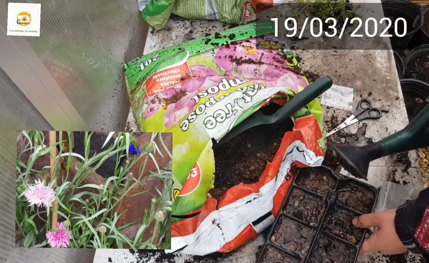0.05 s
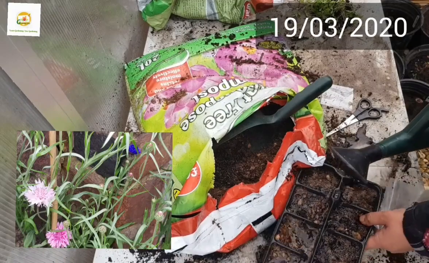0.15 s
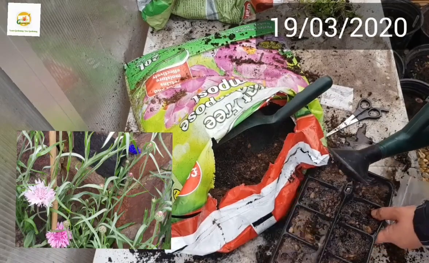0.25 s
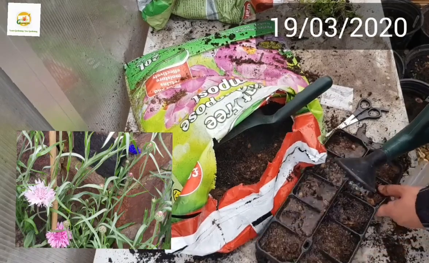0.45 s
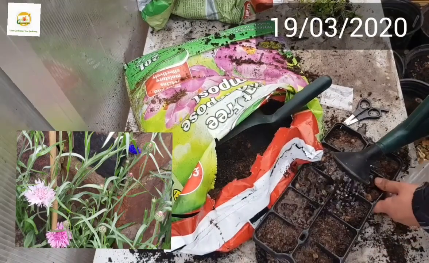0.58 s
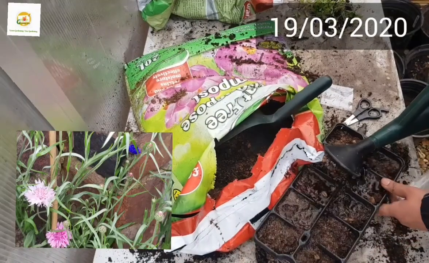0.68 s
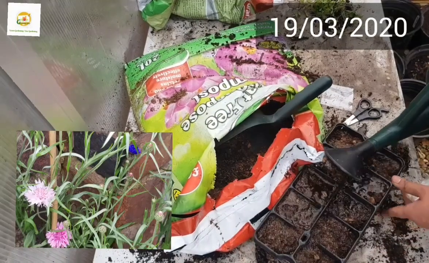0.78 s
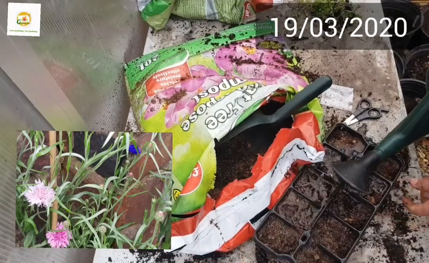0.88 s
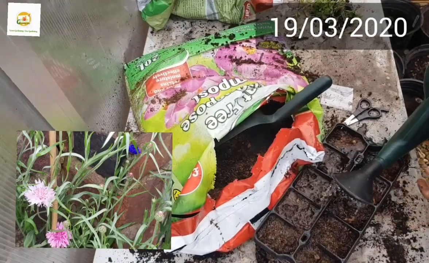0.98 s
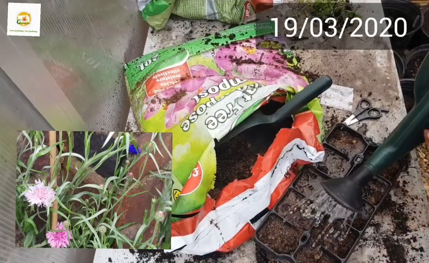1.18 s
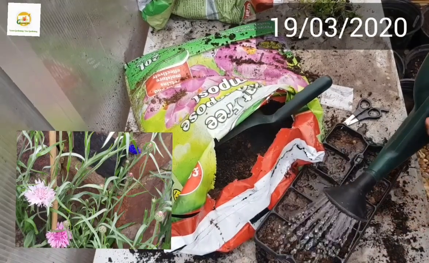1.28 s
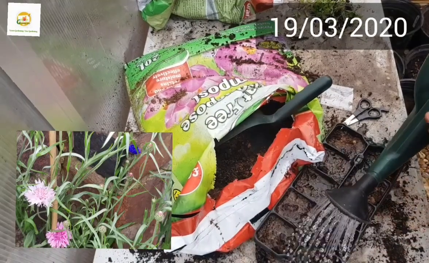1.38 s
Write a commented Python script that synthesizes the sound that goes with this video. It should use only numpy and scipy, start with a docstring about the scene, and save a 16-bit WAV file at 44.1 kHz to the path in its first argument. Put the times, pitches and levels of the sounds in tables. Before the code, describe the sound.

A plastic seed tray scrapes over a gritty bench, then water starts sprinkling softly.

```python
"""Seed tray and watering can

A plastic seed tray full of compost is dragged over a gritty bench. It sticks and slips, so it
judders and booms over the crunch of the grit, then knocks as it is let go. The first drops spit
from the rose of a watering can and thicken into a fine spray that fizzes on the plastic and patters
on the compost. Around it all is a small hard-walled room with a low background rumble."""
import sys
import numpy as np
from scipy import signal
from scipy.fft import rfft, irfft
from scipy.io import wavfile
from scipy.ndimage import uniform_filter1d

SR = 44100
rng = np.random.default_rng(int(sys.argv[2]) if len(sys.argv) > 2 else 0)


def store_pcm(level_fs):
    """Save levels as 16-bit WAV."""
    pcm = np.round(np.clip(level_fs, -1, 1) * 32767).astype(np.int16)
    wavfile.write(sys.argv[1], SR, np.atleast_2d(pcm).T)


N = 63945
T = np.arange(N) / SR

# Tone of the background rumble and hiss. Each row: frequency in Hz, relative level in dB.
RUMBLE_EQ = [(20, -26), (33, -17), (48, 1.5), (65, 2), (90, -6.5), (130, -2.5), (175, -13.5), (230, -12.5),
             (330, -24.5), (600, -20), (1200, -25.5), (2500, -35), (6000, -30), (16000, -28.5)]
# How centred the background sits. Each row: frequency in Hz, left-right likeness from 0 to 1.
RUMBLE_LIKENESS = [(30, 0.79), (120, 1), (300, 0.58), (600, 0.37), (1200, 0), (3000, .05), (16000, 0)]
# Tone of the reverb. Each row: frequency in Hz, gain on the reverb return in dB.
REVERB_EQ = [(60, -18), (200, -24.5), (500, -4), (1200, -5), (4000, 0), (16000, 4)]

# Swell of the spray on plastic, then on compost. Each row: time in seconds, level in dB.
FIZZ_FADER = [(.8, -84), (.87, -62.5), (.95, -69), (1.03, -53), (1.07, -64), (1.11, -58.5), (1.15, -67),
              (1.228, -56), (1.245, -50.5), (1.29, -52.5), (1.34, -54.5), (1.38, -50), (1.45, -46)]
PATTER_FADER = [(.8, -71.5), (1.0, -67), (1.1, -64.5), (1.22, -94), (1.29, -55), (1.35, -60.5),
                (1.41, -51.5), (1.45, -51)]
# Tone of the bright fizz and the dull patter. Each row: frequency in Hz, relative level in dB.
FIZZ_EQ = [(400, -18), (1500, -14), (2300, -5), (3600, 1), (5500, -1.5), (8500, 0.5), (12000, -1),
           (16000, -2)]
PATTER_EQ = [(100, -20), (300, -2), (600, -2), (1000, 1.5), (1500, -4.5), (2200, -11.5), (5000, -29),
             (16000, -52)]
# Single drops that stand out of the spray. Each row: start in seconds, relative level in dB,
# centre in Hz, width in octaves, decay in seconds.
SPITS = [(.904, -43.5, 7300, 0.43, 0.0066), (0.955, -44, 12400, 0.16, .002),
         (0.971, -43.5, 4560, 0.11, 0.0076), (1.028, -38, 11200, 0.31, 0.0024),
         (1.073, -42, 12300, .3, .002), (1.0915, -37, 9100, 0.55, 0.0079),
         (1.205, -29.5, 11200, .25, 0.0033), (1.234, -29.5, 11000, 0.96, 0.0033),
         (1.248, -31.5, 3070, 0.98, 0.0048), (1.3153, -36, 5000, 0.67, 0.0048),
         (1.349, -31, 10900, 1, 0.0035), (1.398, -33, 8900, .6, .002)]

# Bench thumps. Each row: start in seconds, level in dB, pitch in Hz, decay in seconds.
BENCH_THUMPS = [(.145, -40.5, 62, 0.028), (0.224, -42, 70, .04), (0.359, -29, 87, 0.028),
                (.6, -34, 57.6, 0.027), (0.616, -41, 126.8, 0.054), (0.688, -43, 46.6, 0.13),
                (.778, -35.5, 105, 0.016)]
# Knocks of the tray. Each row: start in seconds, relative level in dB, centre in Hz,
# width in octaves, decay of the crack in seconds.
TRAY_KNOCKS = [(0.064, -41, 1325, 0.27, 0.0064), (.148, -31.5, 1020, 0.23, 0.0036),
               (0.2576, -24.5, 950, 0.32, 0.0022), (0.285, -24.5, 3300, 0.31, 0.0076),
               (.453, -21.5, 1320, 0.32, 0.0081), (.5065, -25.5, 780, 0.41, 0.0082),
               (.527, -22, 4000, 0.31, 0.0027), (.607, -25.5, 1200, 1.45, 0.0022),
               (0.6881, -24, 900, 0.72, 0.0049), (.689, -18.5, 2276, 0.1, 0.0014),
               (.696, -31, 1040, 0.33, 0.0033), (.744, -41, 814, .6, 0.0025),
               (.778, -28, 1235, 0.47, 0.0022)]
# Ring of knocked plastic. Each row: pitch in Hz, relative level in dB, seconds to fall 60 dB.
KNOCK_RING = [(798, 0.5, 0.05), (896, 2.5, 0.031), (1017, -2.5, 0.049), (1356, -3.5, 0.073),
              (1673, 4, 0.028), (2160, 1.5, 0.021), (2930, -17, 0.026)]
# Shape of the drag's grit, rattle and boom. Each row: time in seconds, level in dB.
GRIT_FADER = [(0, -69), (.04, -64.5), (.072, -49.5), (.13, -62), (.16, -53), (.22, -50), (.29, -39),
              (.39, -41.5), (.47, -39.5), (.53, -37), (.576, -40), (.63, -56), (.665, -49), (.692, -40.5),
              (.73, -60.5), (.77, -50), (.8, -50), (.85, -67.5)]
RATTLE_FADER = [(0, -71), (.07, -61), (.13, -61), (.22, -54), (.26, -42.5), (.31, -39.5), (.37, -43),
                (.42, -35.5), (.48, -42), (.53, -31), (.6, -51), (.635, -54.5), (.66, -53), (.695, -42),
                (.725, -59.5), (.77, -57), (.795, -61), (.84, -78)]
BOOM_FADER = [(0, -70), (.13, -72), (.2, -50), (.24, -39), (.32, -34.5), (.36, -32.5), (.385, -27.5),
              (.42, -34), (.48, -31.5), (.51, -32), (.595, -30), (.635, -47.5), (.7, -50), (.85, -67)]
# Tone of the same three layers. Each row: frequency in Hz, relative level in dB.
GRIT_EQ = [(300, -46), (1200, -3.5), (2500, -1.5), (4200, -1), (5500, -2.5), (8000, -4), (12000, -6),
           (16000, -10)]
RATTLE_EQ = [(100, -23.5), (300, 2), (500, 0), (900, 4), (1300, -5.5), (1900, -6.5), (2800, -7.5),
             (5000, -22.5), (16000, -34)]
BOOM_EQ = [(30, -15), (80, -1), (225, -3.5), (270, -5.5), (330, -13), (600, -34), (3000, -53)]
# Resonances of the tray's cells (low) and walls (high).
# Each row: pitch in Hz, bandwidth in Hz, relative level in dB.
CELL_MODES = [(77, 25, -13), (121, 26, 0.5), (161.5, 27, 3.5), (193.8, 26.3, 2.5), (236.4, 16, -2)]
WALL_MODES = [(367, 29, -7.5), (513.7, 44, 2.5), (640, 41, -1.5), (702, 8.8, -3), (833, 41, -2),
              (940, 48, -3), (1070, 116, 2.5), (1350, 120, -12), (1744, 41, -6.5), (2790, 85, -8.5)]

RUMBLE_DB, WATER_SEND_DB, LEFT_OVER_RIGHT_DB = -50.5, -2.5, 0.45
BASS_T60_S, TREBLE_T60_S, TAIL_SHIFTS_PER_S = 0.25, 0.067, 9.01
FIZZ_PER_S, PATTER_PER_S, GRIT_PER_S, RATTLE_PER_S = 1500, 1000, 3000, 1600
JUDDER_HZ, JUDDER_WANDER = 122, 0.07  # stick-slip rate, and its drift as a share of that rate
TREBLE_SPREAD = 0.85  # share of the bright layers' power that differs between the ears
LEFT_LAG_SAMPLES, HIGH_CUT_HZ = 4, 15900


def amp(db):
    """Decibels to gain."""
    return 10 ** (np.asarray(db) / 20)


def unit(x):
    """Scales to rms 1."""
    return x / np.sqrt(np.mean(x ** 2) + 1e-20)


def curve_at(points, hz):
    """Reads a curve on a log-frequency axis."""
    f, value = np.transpose(points)
    return np.interp(np.log(hz + 1), np.log(f + 1), value)


def fader(points):
    """Rides the gain along a dB curve, then fades at 77 dB a second after its last point."""
    times, db = np.transpose(points)
    return amp(np.interp(T, times, db) - 77 * np.maximum(T - times[-1], 0))


def place(mix, start_s, sound):
    """Lays a sound into the mix at its cue."""
    part = mix[:, max(round(start_s * SR), 0):]
    part[:, :sound.shape[-1]] += sound[..., :part.shape[1]]


def eq(x, points, size=2048):
    """Minimum-phase EQ: shapes the tone with no ringing ahead of an attack."""
    log_gain = np.log(amp(curve_at(points, abs(np.fft.fftfreq(size, 1 / SR)))))
    taps = np.fft.ifft(np.exp(np.conj(signal.hilbert(log_gain)))).real
    return signal.oaconvolve(x, taps[None], axes=1)[:, :N]


def resonate(x, modes):
    """Plays a signal through damped resonances; the narrow ones ring longest."""
    t = T[:SR // 4]
    body = np.zeros(len(t))
    for hz, width_hz, db in modes:
        envelope = amp(db) * np.sqrt(width_hz) * np.exp(-np.pi * width_hz * t)
        body += envelope * np.sin(2 * np.pi * hz * t + rng.uniform(0, 2 * np.pi))
    return signal.oaconvolve(x, body[None], axes=1)[:, :N]


def stereo_noise(length, spread):
    """White noise, from mono at spread 0 to fully wide at 1."""
    noise = rng.standard_normal((3, length))
    return np.sqrt(1 - spread) * noise[0] + np.sqrt(spread) * noise[1:]


def grains(per_s, size_db, decay_s, spread):
    """A scatter of tiny noise bursts of uneven size, each with an instant attack."""
    sizes = amp(size_db * np.minimum(rng.exponential(1, N), 4))
    hits = sizes * (rng.random(N) < per_s / SR)
    power = signal.lfilter([1], [1, -np.exp(-2 / (decay_s * SR))], hits ** 2 + 1e-12)
    return unit(np.sqrt(power) * stereo_noise(N, spread))


def burst(hz, octaves, decay_s, spread):
    """A dying puff of noise around one frequency."""
    t = T[:SR // 5]
    f = np.fft.rfftfreq(len(t), 1 / SR) + 1
    rolloff = np.sqrt(1 + (np.log2(f / hz) / octaves) ** 6)
    noise = irfft(rfft(stereo_noise(len(t), spread)) / rolloff, len(t))
    return unit(noise) * np.exp(-t / decay_s)


def room_rumble():
    """The bed: a steady low rumble near the centre, with a faint wide hiss."""
    hz = np.fft.rfftfreq(N, 1 / SR)
    left, separate = rfft(rng.standard_normal((2, N))) * amp(curve_at(RUMBLE_EQ, hz))
    likeness = curve_at(RUMBLE_LIKENESS, hz)
    right = likeness * left + np.sqrt(1 - likeness ** 2) * separate
    return amp(RUMBLE_DB) * unit(irfft(np.array([left, right]), N))


def wall_tail():
    """A short dense tail from close walls, different in each ear; the treble dies first."""
    hz, t, noise = signal.stft(rng.standard_normal((2, SR // 3)), SR, nperseg=256)
    t60_s = curve_at([(200, BASS_T60_S), (12000, TREBLE_T60_S)], hz)
    fade = amp(-60 * t / t60_s[:, None])
    tail = signal.istft(noise * fade / np.linalg.norm(fade, axis=1, keepdims=True), SR)[1]
    tail *= np.minimum(T[:tail.shape[1]] / 0.0029, 1)  # soften the onset
    return tail / np.linalg.norm(tail[0])


def room_reverb(send, tails=5):
    """The reflections change as tray and can move: the send crossfades from one tail to the next."""
    wet = np.zeros((2, N))
    for k in range(tails):
        share = np.maximum(1 - abs((T * TAIL_SHIFTS_PER_S + k) % tails - 1), 0)
        wet += signal.fftconvolve(send * np.sqrt(share), wall_tail(), axes=1)[:, :N]
    return eq(wet, REVERB_EQ)


def water_spray():
    """Fine drops fizz on the plastic and patter on the compost; a few spit louder."""
    fizz = grains(FIZZ_PER_S, size_db=3, decay_s=0.0012, spread=TREBLE_SPREAD)
    patter = grains(PATTER_PER_S, size_db=1.5, decay_s=0.0017, spread=0.62)
    out = unit(eq(fizz, FIZZ_EQ)) * fader(FIZZ_FADER)
    out += unit(eq(patter, PATTER_EQ)) * fader(PATTER_FADER)
    for start_s, db, hz, octaves, decay_s in SPITS:
        place(out, start_s, amp(db - 8) * burst(hz, octaves, decay_s, TREBLE_SPREAD))
    return out


def bench_thumps():
    """The bench gives a short low swing when the tray's weight shifts."""
    out, t = np.zeros((2, N)), T[:SR // 2]
    attack = 1 - np.exp(-t / 0.0048)
    for start_s, db, hz, decay_s in BENCH_THUMPS:
        place(out, start_s, amp(db) * attack * np.exp(-t / decay_s) * np.sin(2 * np.pi * hz * t))
    return out


def tray_knocks():
    """Dry cracks of the plastic, each ringing the modes near its own centre most."""
    out, t = np.zeros((2, N)), T[:SR // 5]
    for start_s, db, centre_hz, octaves, crack_s in TRAY_KNOCKS:
        ring = np.zeros(len(t))
        for hz, mode_db, t60_s in KNOCK_RING:
            rolloff = 1 + (np.log2(hz / centre_hz) / octaves) ** 4
            ring += amp(mode_db - 60 * t / t60_s) * np.sin(2 * np.pi * hz * t) / rolloff
        crack = burst(centre_hz, octaves, crack_s, spread=0.4)
        place(out, start_s, amp(db) * (amp(-9) * crack + amp(-12) * ring))
    return out


def stick_slip():
    """The tray catches and lets go: one click per slip, uneven in pace and strength."""
    drift = unit(uniform_filter1d(rng.standard_normal(N), 200))
    cycles = np.cumsum(JUDDER_HZ * (1 + JUDDER_WANDER * drift)) / SR
    clicks = np.diff(np.floor(cycles), prepend=0)
    return unit(clicks * amp(3.1 * rng.standard_normal(N)))


def tray_drag():
    """Slips boom the tray's cells, while grit rattles its walls and crunches beneath."""
    slips = stick_slip()
    bumps = grains(RATTLE_PER_S, size_db=2.2, decay_s=0.00056, spread=0.53)
    roughness = grains(900, size_db=1.0, decay_s=0.00046, spread=0.015)
    cell_ring = resonate(0.42 * slips + roughness, CELL_MODES)
    boom = unit(eq(cell_ring, BOOM_EQ))
    boom /= np.sqrt(uniform_filter1d((boom ** 2).mean(0), 1800) + 0.05)  # compress before the fader
    wall_ring = unit(resonate(bumps + 1.02 * slips, WALL_MODES))
    rattle = unit(unit(eq(bumps, RATTLE_EQ)) + amp(-3) * wall_ring)
    crunch = grains(GRIT_PER_S, size_db=2, decay_s=0.00059, spread=TREBLE_SPREAD)
    grit = unit(eq(crunch, GRIT_EQ))
    return boom * fader(BOOM_FADER) + amp(1.5) * rattle * fader(RATTLE_FADER) + grit * fader(GRIT_FADER)


def scene():
    """Tray and water in the room; the left side is a touch louder."""
    tray = tray_drag() + tray_knocks() + bench_thumps()
    spray = water_spray()
    direct = tray + spray
    direct[0] = np.pad(direct[0], (LEFT_LAG_SAMPLES, 0))[:N]  # reaches the left ear a moment later
    reverb = room_reverb(tray + amp(WATER_SEND_DB) * spray)
    balance = amp([[LEFT_OVER_RIGHT_DB / 2], [-LEFT_OVER_RIGHT_DB / 2]])
    return (direct + reverb + room_rumble()) * balance


def record(dry):
    """A steep high cut takes the very top off the mix."""
    high_cut = signal.firwin(511, HIGH_CUT_HZ, window=("kaiser", 9), fs=SR)
    return signal.oaconvolve(dry, high_cut[None], "same")


dry = scene()
out = record(dry)
store_pcm(out)
```